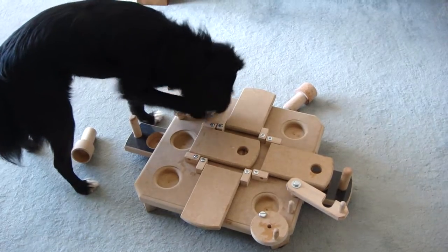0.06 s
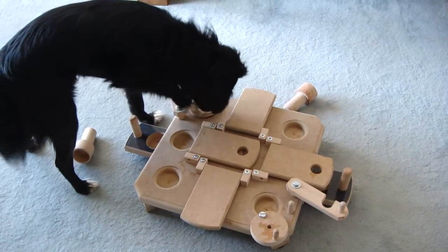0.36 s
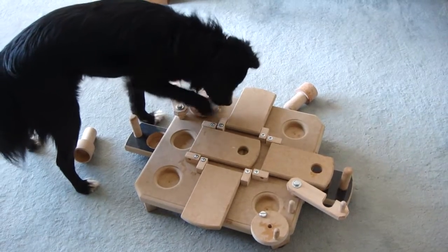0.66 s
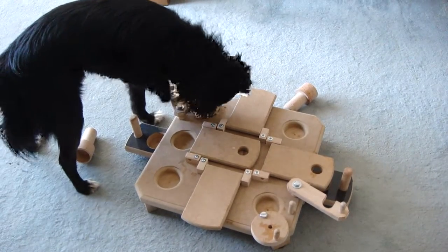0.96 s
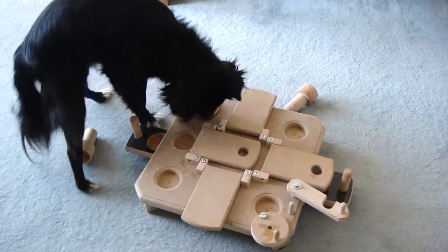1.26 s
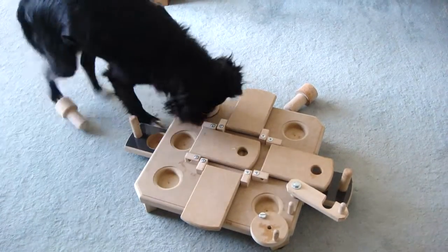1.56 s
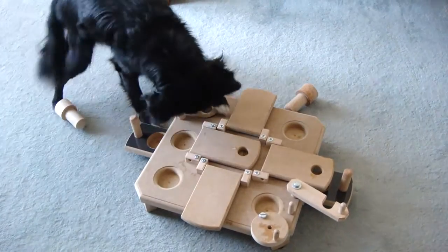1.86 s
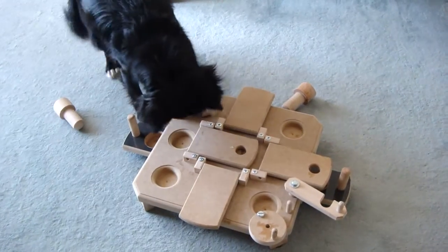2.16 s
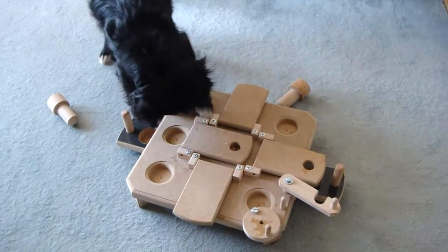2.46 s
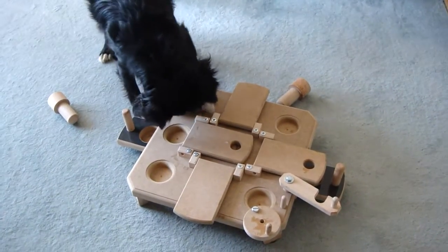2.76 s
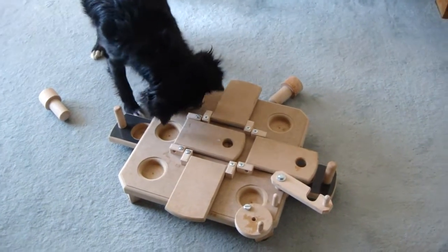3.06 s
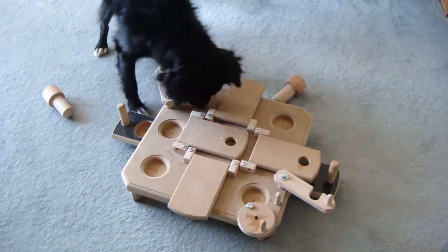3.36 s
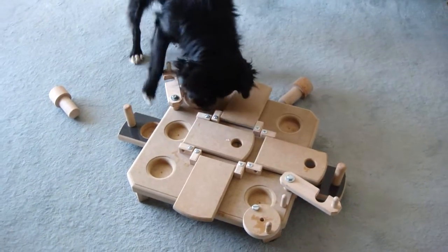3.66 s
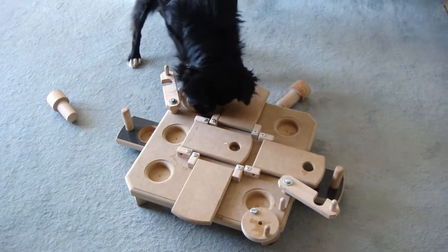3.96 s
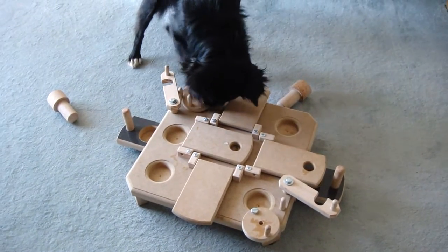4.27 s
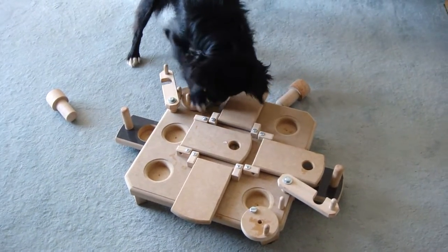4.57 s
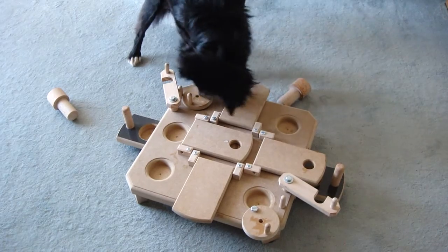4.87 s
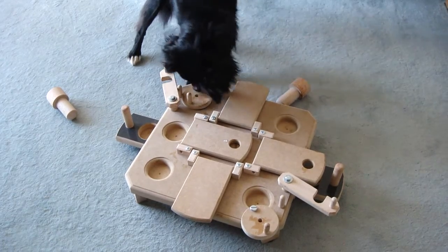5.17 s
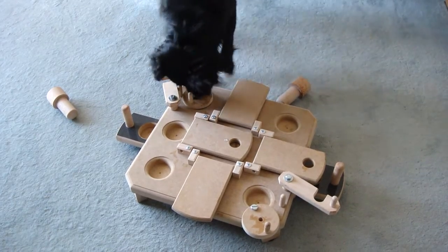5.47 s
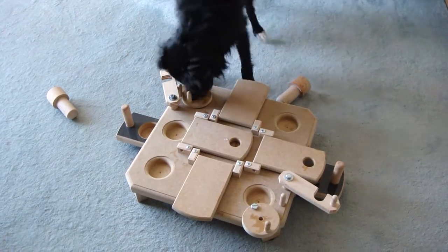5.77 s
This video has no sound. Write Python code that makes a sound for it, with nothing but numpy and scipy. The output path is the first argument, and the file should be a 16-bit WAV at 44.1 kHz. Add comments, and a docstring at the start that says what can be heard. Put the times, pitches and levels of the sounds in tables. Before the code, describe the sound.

A dog noses and paws a wooden puzzle toy, its flaps and lids knocking and clacking irregularly amid light scrapes and claw taps.

```python
"""A light scrape, then wooden knocks: a dog noses and paws a puzzle board on a carpet.
Flaps and lids fall and rebound, claws and teeth tap; each contact is a few milliseconds of damped
wood, answered by the board and a small living room. Sliding claws rasp, a few dull thuds sound low,
a loose hollow peg is kicked over, and a bit of metal, likely the collar tag, jingles."""
import sys
import numpy as np
from scipy import signal
from scipy.fft import rfft, irfft, next_fast_len
from scipy.io import wavfile
from scipy.ndimage import uniform_filter1d, minimum_filter1d

SR = 44100
rng = np.random.default_rng(int(sys.argv[2]) if len(sys.argv) > 2 else 0)


def pcm_store(signal):
    """Save signal as 16-bit PCM."""
    levels = np.round(np.clip(np.atleast_2d(signal), -1, 1) * 32767)
    wavfile.write(sys.argv[1], SR, levels.astype(np.int16).T)


N = 265041


def amp(db):
    """Decibels to gain."""
    return 10 ** (np.asarray(db) / 20)


def unit_rms(x):
    """Scale to rms 1."""
    return x / np.sqrt(np.mean(x ** 2) + 1e-20)


def burst(x):
    """Scale to the energy of 10 ms at rms 1."""
    return x / np.linalg.norm(x) * np.sqrt(SR / 100)


def curve_at(points, hz):
    """Interpolate (f/Hz, value) points on a log frequency axis."""
    points_hz, values = np.transpose(points)
    return np.interp(np.log(hz + 1), np.log(points_hz), values)


def filtered(x, gain_at_hz):
    """Zero-phase filter."""
    size = next_fast_len(len(x) + 8192)
    hz = np.fft.rfftfreq(size, 1 / SR)
    return irfft(rfft(x, size) * gain_at_hz(hz), size)[:len(x)]


def band(x, low_hz, high_hz, order=2):
    """Causal band-pass."""
    sos = signal.butter(order, [low_hz, high_hz], "band", fs=SR, output="sos")
    return signal.sosfilt(sos, x)


def add(track, start_s, x):
    """Mix x into the track."""
    start = round(start_s * SR)
    track[start:start + len(x)] += x[:N - start]


def ring(modes, t, spread_db, detune):
    """Damped modes; each blow lands elsewhere, so strengths, signs and pitches vary."""
    hz, db, t60_s = np.transpose(modes)[:, :, None]
    size, shift, side = rng.standard_normal((3, len(modes), 1))
    waves = np.sign(side) * np.sin(2 * np.pi * hz * (1 + detune * shift) * t)
    return np.sum(amp(db + spread_db * size - 60 * t / t60_s) * waves, axis=0)


# background spectrum: f/Hz, relative density/dB
AIR_SPECTRUM = [(15, -64), (25, -20), (58, -56), (77, -17), (228, -6.5), (287, -5.5), (361, -8),
                (421, -3.5), (478, -3.5), (632, -5.5), (755, -3.5), (836, -4), (2900, -13), (10900, -21.5),
                (14200, -33), (22000, -120)]


def room_tone(level_db=-55.5):
    """Steady low rush and faint hiss."""
    noise = filtered(rng.standard_normal(N), lambda hz: amp(curve_at(AIR_SPECTRUM, hz)))
    return amp(level_db) * unit_rms(noise)


# reverberation time: f/Hz, t60/s
REVERB_T60 = [(200, 0.67), (500, 0.34), (1200, 0.33), (2700, 0.35), (5000, 0.27), (10000, .21)]
# reverberation colour: f/Hz, relative level/dB
REVERB_SPECTRUM = [(100, 6.5), (330, 0.5), (470, 16.5), (750, -3.5), (1200, 5.5), (2500, 1), (5000, 6.5),
                   (10000, 2.5)]


def reverb(x, room_db, build_s=.0011, hold_s=.0033):
    """The room's answer builds, holds while the first walls reply, then dies, treble first."""
    hz, t, noise = signal.stft(rng.standard_normal(SR // 3), SR, nperseg=256)
    age_s = np.hypot(t, hold_s) - hold_s
    colour_db = curve_at(REVERB_SPECTRUM, hz)[:, None]
    t60_s = curve_at(REVERB_T60, hz)[:, None]
    tail = signal.istft(noise * amp(colour_db - 60 * age_s / t60_s), SR, nperseg=256)[1]
    tail *= 1 - np.exp(-(np.arange(len(tail)) / SR / build_s) ** 2)
    return signal.fftconvolve(x, amp(room_db) * tail / np.linalg.norm(tail))


def in_room(x, room_db):
    """Direct sound plus reverberation."""
    wet = reverb(x, room_db)
    return wet + np.pad(x, (0, len(wet) - len(x)))


# dull low thuds: t/s, level/dB, t60/s, low edge/Hz
LOW_THUDS = [(1.656, -41, 0.15, 224), (1.687, -40.5, 0.079, 180), (1.718, -41.5, 0.14, 157),
             (2.31, -30, 0.012, 60.3)]


def low_thuds(top_hz=550):
    """Three soft bumps on the carpet, and a short low thump under the loudest slam."""
    track, t = np.zeros(N), np.arange(SR // 5) / SR
    for start_s, db, t60_s, low_hz in LOW_THUDS:
        bump = band(rng.standard_normal(len(t)) * amp(-60 * t / t60_s), low_hz, top_hz)
        add(track, start_s, amp(db) * burst(bump))
    return track


# metal tag modes: f/Hz, relative level/dB, t60/s
TAG_MODES = [(3790, 8.5, 0.023), (4080, 9.5, 0.036), (6150, 8.5, 0.027), (6850, 2, 0.039),
             (9600, 14, 0.013), (10770, -2, 0.042)]
# tag swings: t/s, level/dB
TAG_SWINGS = [(1.3788, -37.5), (1.4298, -41), (1.458, -40), (1.632, -26.5), (1.982, -62)]


def tag_jingles(tick_db=13, tick_t60_s=.0074, room_db=-4):
    """The swinging tag ticks, then rings in a few high modes."""
    track, t = np.zeros(N), np.arange(SR // 4) / SR
    for start_s, db in TAG_SWINGS:
        tick = amp(tick_db - 60 * t / tick_t60_s) * band(rng.standard_normal(len(t)), 2700, 18000)
        metal = ring(TAG_MODES, t, spread_db=2, detune=.003)
        add(track, start_s, in_room(amp(db) * burst(metal + tick), room_db))
    return track


# hollow peg modes: f/Hz, relative level/dB, t60/s
PEG_MODES = [(492, -13, 0.071), (519, -8.5, 0.037), (955, -0.5, 0.02), (1084, -9.5, 0.037),
             (1925, -8.5, 0.026)]
# peg bounces: t/s, level/dB
PEG_BOUNCES = [(1.3774, -34), (1.4298, -25), (1.6121, -24)]


def peg_tumbles(attack_s=.002, room_db=-4):
    """The hollow peg gives a short, round note at each bounce, softened by the carpet."""
    track, t = np.zeros(N), np.arange(SR // 5) / SR
    rise = 1 - np.exp(-(t / attack_s) ** 2)
    for start_s, db in PEG_BOUNCES:
        peg = ring(PEG_MODES, t, spread_db=1.5, detune=.01)
        add(track, start_s, in_room(amp(db) * burst(rise * peg), room_db))
    return track


# flap and lid modes, scraped or struck: f/Hz, relative level/dB, t60/s
WOOD_MODES = [(478, -5.5, 0.047), (690, -2.5, 0.022), (823, -0.5, 0.038), (1020, -2, 0.019),
              (1152.4, 0.5, 0.026), (1303, -5.5, 0.016), (1630, 2, 0.013), (2070, -3, 0.041),
              (2280, 1.5, 0.011), (2671, -1, 0.036), (3400, -23, 0.0069), (3370, -6.5, 0.0058),
              (5170, 1, 0.017), (6100, -35, 0.0064), (7100, -39, .006), (8100, -42, 0.0051),
              (9150, 11.5, 0.0021)]
# claws and wood sliding on the board: start/s, end/s, wood level/dB, hiss level/dB
SCRAPE_STROKES = [(0.151, 0.198, -42, -46.5), (0.214, 0.295, -41.5, -52), (0.443, 0.453, -37.5, -44),
                  (0.641, 0.712, -40, -45), (0.975, 1.007, -54, -52.5), (1.58, 1.599, -46, -53),
                  (1.93, 1.984, -37.5, -37), (2.568, 2.606, -56, -29.5), (2.658, 2.652, -52, -28.5),
                  (2.874, 2.904, -36, -40.5), (3.095, 3.116, -58, -39), (4.313, 4.359, -34.5, -50),
                  (4.393, 4.407, -39.5, -52), (4.855, 4.899, -43.5, -45), (5.417, 5.472, -45.5, -72),
                  (5.767, 5.87, -52, -79)]


def scrapes(grain_db=4, grain_samples=64, hiss_hz=3610, room_db=-5):
    """Tiny uneven slips swell and fade in each stroke, exciting the wood and a thin rasp."""
    track, t = np.zeros(N), np.arange(SR // 16) / SR
    slips = rng.standard_normal(N)
    grains = np.repeat(rng.standard_normal(N // grain_samples + 1), grain_samples)[:N]
    slips *= amp(grain_db * grains)
    for start_s, end_s, wood_db, hiss_db in SCRAPE_STROKES:
        length = max(round((end_s - start_s) * SR), 256)
        stroke = slips[round(start_s * SR):][:length]
        swell = np.sqrt(np.hanning(length))
        body = ring(WOOD_MODES, t, spread_db=2, detune=.015)
        wood = band(signal.fftconvolve(stroke, body)[:length], 590, 2200)
        hiss = band(stroke, hiss_hz / 1.13, hiss_hz * 1.13, order=1)
        rasp = amp(wood_db) * unit_rms(wood) + amp(hiss_db) * unit_rms(hiss)
        add(track, start_s, in_room(swell * rasp, room_db))
    return track


# contact registers (hollow, body, overtone, click): low edge/Hz, high edge/Hz, crack t60/s
CONTACT_REGISTERS = [(499, 1147, 0.041), (926, 1850, 0.021), (1837, 3330, 0.015), (3800, 7850, 0.021)]


def wood_contact(pitch_hz, levels_db, directions=3, focus_db_per_octave=20):
    """One blow, a row per direction: a noisy crack plus modes, favouring those near the piece's pitch."""
    t = np.arange(SR // 32) / SR
    hz, db, t60_s = np.transpose(WOOD_MODES)
    octaves_away = np.minimum(np.abs(np.log2(hz / pitch_hz)), .5)
    modes = np.column_stack([hz, db - focus_db_per_octave * octaves_away, t60_s])
    wood = np.array([ring(modes, t, spread_db=2, detune=.02) for _ in range(directions)])
    blow = np.zeros_like(wood)
    for level_db, (low_hz, high_hz, crack_t60_s) in zip(levels_db, CONTACT_REGISTERS):
        crack = amp(-60 * t / crack_t60_s) * rng.standard_normal(wood.shape)
        register = band(wood + crack, low_hz, high_hz)
        blow += amp(level_db) * np.array([burst(part) for part in register])
    return blow


# claw and tooth taps: t/s, level/dB, click re level/dB
CLAW_TAPS = [(0.157, -37.5, -3), (0.6122, -39, -0.5), (0.6191, -31.5, -6), (0.6646, -38, 2.5),
             (1.231, -37.5, -3), (1.6097, -32, 3.5), (1.8823, -34.5, -5), (2.5216, -24, -5),
             (2.5977, -34, 1), (2.64, -36.5, 1), (3.0982, -42, -4), (3.198, -40, -4), (4.912, -32, -0.5),
             (4.9342, -30, 0.5), (4.9428, -30.5, 1.5)]


def taps(pitch_hz=1400, hollow_db=-11, overtone_db=1, room_db=-9):
    """Claws and teeth make thin, light contacts, all at one pitch."""
    for start_s, db, click_db in CLAW_TAPS:
        yield start_s, pitch_hz, (db + hollow_db, db, db + overtone_db, db + click_db), room_db


# falling flaps and lids: t/s, pitch/Hz, level/dB, hardness/dB, touch lead/s, rebound lag/s (0 = none)
FLAP_FALLS = [(0.2686, 1360, -13.5, -4, 0, .011), (0.3289, 1330, -16, -4, 0.00021, 0),
              (0.7103, 1400, -14, -10, .025, 0.00011), (0.7314, 1330, -21.5, -1.5, 0.00021, .011),
              (0.81, 1240, -32.5, -25, 0, 0.00022), (0.8837, 1270, -16.5, -9.5, .004, 0.00031),
              (0.9059, 1280, -18.5, -7, 0.0014, 0.00093), (1.1785, 1130, -50.5, -23, 0.00035, 0.00033),
              (1.3743, 1180, -20.5, -6, 0.00037, 0.00046), (1.4287, 1210, -25, -30, 0.00094, 0.00093),
              (1.6097, 1020, -17.5, -8.5, 0.0018, .004), (2.025, 1230, -12.5, -8.5, .016, 0),
              (2.0499, 1390, -19.5, -3.5, 0.00073, 0.00013), (2.171, 1240, -14.5, -13, 0.00072, .0056),
              (2.2658, 1630, -25.5, -20, 0.00011, 0.00025), (2.3113, 1480, -2.5, -2.5, 0.00027, 0.0023),
              (2.606, 1180, -28.5, -19, 0.00053, 0.00021), (2.6419, 1440, -13.5, -3.5, 0.0013, 0),
              (2.7768, 1200, -25, -9.5, 0.0012, 0.00041), (2.799, 1520, -10.5, -8.5, .005, 0),
              (2.8271, 1380, -22, -20, 0, 0), (2.8404, 1350, -21, -4.5, 0.0013, 0),
              (2.8827, 1280, -24.5, -6.5, 0, 0.000087), (2.9583, 1103, -14.5, -7.5, 0.0016, 0),
              (3.0684, 1120, -44, -7, 0, 0.000051), (3.1261, 1180, -43, -8, 0, 0),
              (3.5505, 1430, -47.5, -7, 0, 0), (3.6968, 1000, -31.5, -13, 0.0012, 0.00076),
              (4.2503, 1545, -10.5, -11, .011, .003), (4.3213, 1150, -22, -20, 0.00083, 0.02),
              (4.5613, 1410, -12, -11, .009, .006), (4.6254, 1270, -16, -4, 0.003, 0),
              (4.7058, 1510, -4.5, -1.5, 0, 0.0032), (5.8374, 1110, -32, -32, 0.0021, 0)]


def flap_blows(touch_db=-8, touch_db_per_s=-420, touch_hardness_db=-2.5, rebound_db=-8.5):
    """A falling piece often touches first (the earlier, the lighter), then lands and rebounds."""
    for start_s, pitch_hz, db, hardness_db, lead_s, lag_s in FLAP_FALLS:
        yield start_s, pitch_hz, db, hardness_db
        if lead_s > 0:
            light_db = db + touch_db + touch_db_per_s * lead_s
            yield start_s - lead_s, pitch_hz, light_db, hardness_db + touch_hardness_db
        if lag_s > 0:
            yield start_s + lag_s, pitch_hz, db + rebound_db, hardness_db


def knocks(middle_hz=1295, firm_db=-16.5, hollow_db_per_octave=-24, room_db_per_octave=9):
    """Gentle blows sound hollow, hard ones bright; large, low pieces are hollower."""
    for start_s, pitch_hz, db, hardness_db in flap_blows():
        octaves = np.log2(pitch_hz / middle_hz)
        hollow_db = -28.5 + .7 * (db - firm_db) + hollow_db_per_octave * octaves
        click_db = db - 19 + .66 * hardness_db
        room_db = -7 + room_db_per_octave * min(octaves, 0)  # low pieces face the listener: drier
        yield start_s, pitch_hz, (hollow_db, db, db + hardness_db, click_db), room_db


# whole-board modes: f/Hz, relative level/dB, t60/s
BOARD_MODES = [(478, 4, 0.74), (662, 21, 0.1), (1087, -6, 0.34), (1168, -14, 0.14), (1384, 8, 0.25),
               (1520, 6, 0.27), (2004, 12, 0.36), (2220, -30, 0.44), (2310, -2, 0.62), (2750, -26, 0.085),
               (3380, 1, .28), (3730, 15.5, 0.35), (4240, -6, 0.32)]


def puzzle_board(board_re_room_db=-15):
    """Each knock and tap arrives directly, sets the board ringing faintly and fills the room."""
    track = np.zeros(N)
    board = ring(BOARD_MODES, np.arange(SR // 4) / SR, spread_db=0, detune=0)
    board = amp(board_re_room_db) * board / np.linalg.norm(board)
    for start_s, pitch_hz, levels_db, room_db in [*knocks(), *taps()]:
        direct, *sideways = wood_contact(pitch_hz, levels_db)
        add(track, start_s, direct)
        add(track, start_s, amp(room_db) * signal.fftconvolve(direct, board))
        # each wall receives a different colour, so the tail is more even than the blow
        tail = sum(reverb(part, room_db) for part in sideways) / np.sqrt(len(sideways))
        add(track, start_s, tail)
    return track


def scene():
    """Mono mix, heard from above the board."""
    return (puzzle_board() + peg_tumbles() + tag_jingles() + scrapes() + low_thuds() + room_tone())[None]


def limiter(x, ceiling_db=-2, release_db_per_s=203):
    """The gain ducks at once under a tall peak and climbs back steadily."""
    over_db = np.maximum(20 * np.log10(np.abs(x) + 1e-9) - ceiling_db, 0)
    climb_db = release_db_per_s * np.arange(N) / SR
    duck_db = np.maximum.accumulate(over_db + climb_db) - climb_db
    gain_db = uniform_filter1d(minimum_filter1d(-duck_db, size=32), size=32)
    return x * amp(gain_db)


def record(dry, clip_level=.76, asymmetry=.031, top_hz=11100):
    """Limit, round off the tallest peaks a little unevenly, then low-pass steeply."""
    held = limiter(dry[0])
    rounded = held / (1 + (held / clip_level) ** 6) ** (1 / 6)
    # unequal half-waves leave a faint low bump under the loudest knocks
    bent = rounded + asymmetry * rounded ** 2
    return filtered(bent, lambda hz: 1 / (1 + (hz / top_hz) ** 120))[None]


dry = scene()
out = record(dry)
pcm_store(out)
```